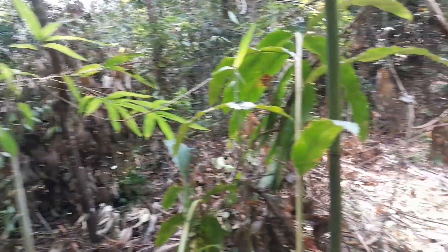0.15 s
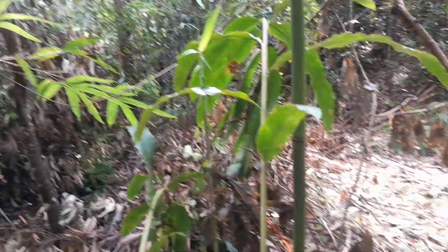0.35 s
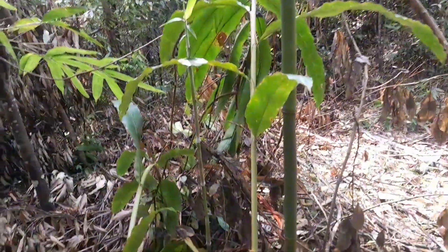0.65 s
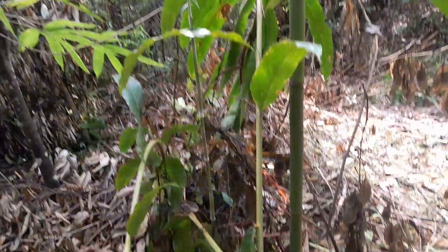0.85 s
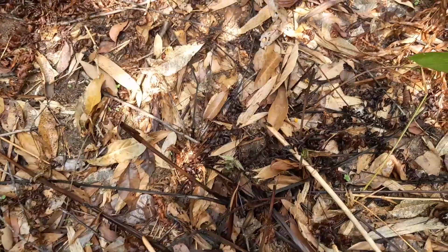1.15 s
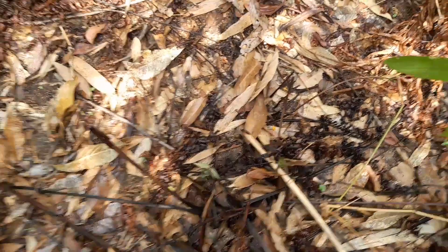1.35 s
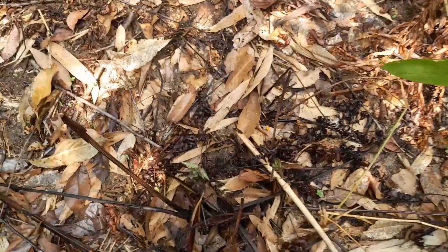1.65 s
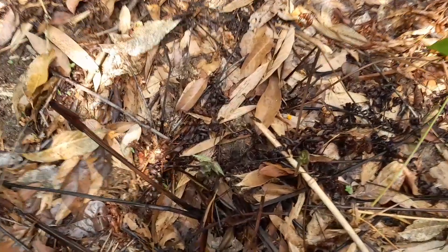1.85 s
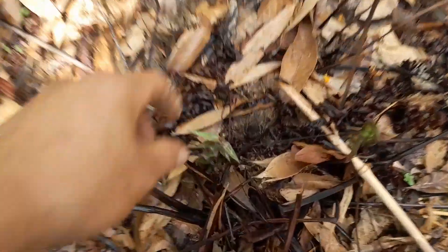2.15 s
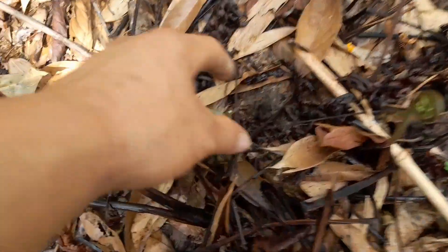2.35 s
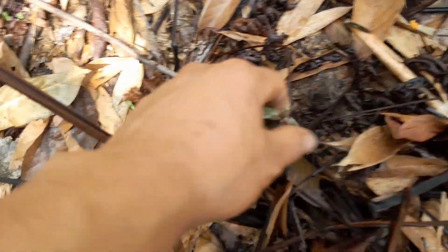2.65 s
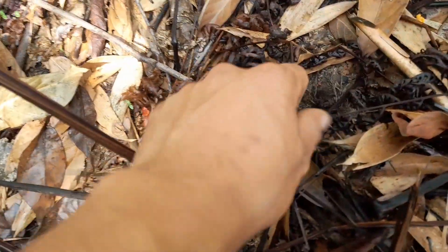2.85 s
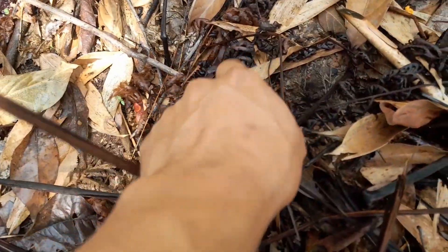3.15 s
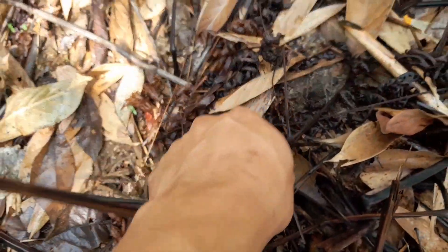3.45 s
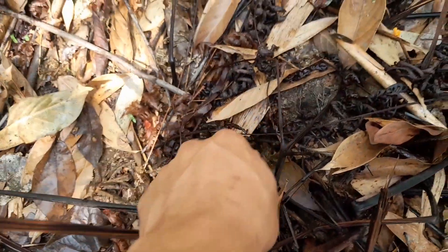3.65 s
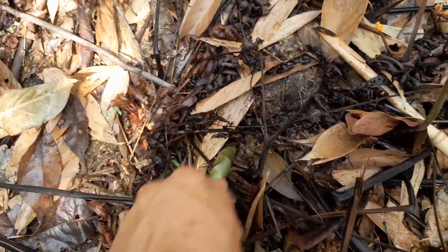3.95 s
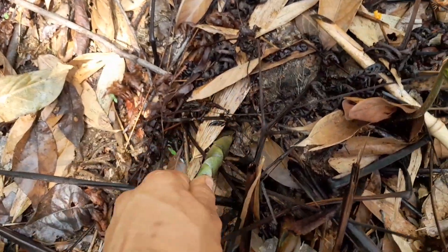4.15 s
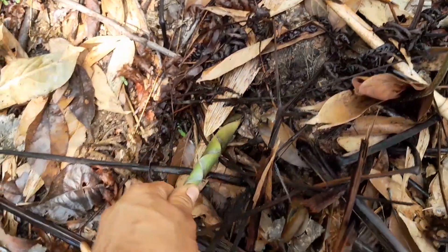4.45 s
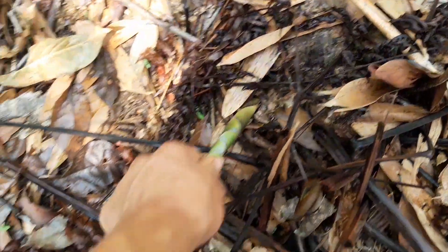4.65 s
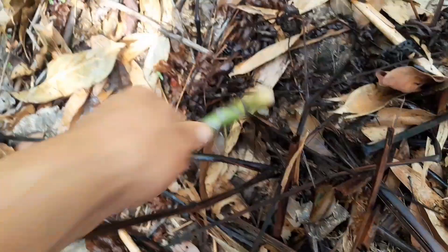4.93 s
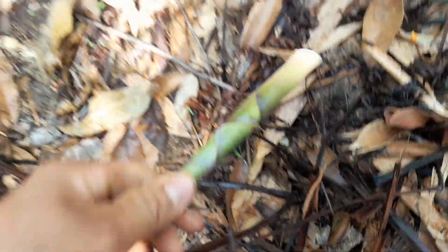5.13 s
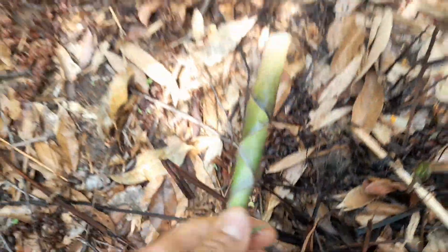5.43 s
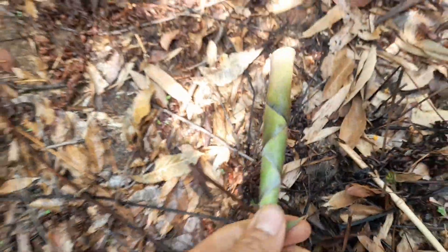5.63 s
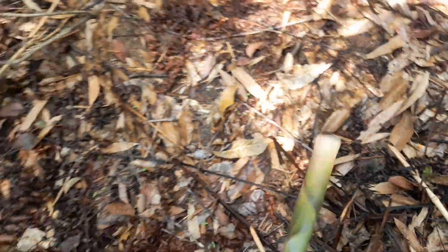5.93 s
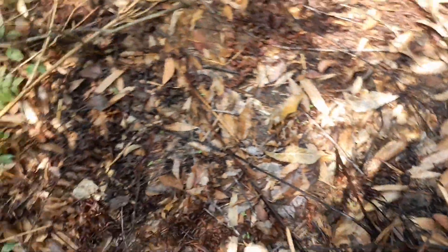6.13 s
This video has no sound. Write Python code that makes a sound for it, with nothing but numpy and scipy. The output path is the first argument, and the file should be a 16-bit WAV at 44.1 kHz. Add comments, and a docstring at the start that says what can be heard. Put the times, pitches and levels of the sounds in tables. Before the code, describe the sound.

A dry leaf crunch, then a green shoot snaps sharply and is pulled free with ticking fibres, under droning cicadas and a whistling bird.

```python
"""In a bamboo thicket with dry leaf litter, a step crunches, then a hand reaches down and snaps off a young shoot.
It draws the shoot out with a run of fibre ticks, and the walk goes on; the hand-held camera is rubbed and bumped.
Cicadas drone throughout; one bird whistles a phrase twice and others chirp further off.
Snaps are short rings with a burst of noise, leaves and rubbing are grainy noise, bumps are fading low tones.
Cicadas are narrow bands of noise, birds are gliding pure tones, and the forest is soft shaped noise."""
import sys
import numpy as np
from scipy import signal
from scipy.fft import rfft, irfft, next_fast_len
from scipy.io import wavfile
from scipy.ndimage import uniform_filter1d, map_coordinates

SR = 44100
rng = np.random.default_rng(int(sys.argv[2]) if len(sys.argv) > 2 else 0)


def store_pcm(level_fs):
    """Save levels as 16-bit WAV."""
    pcm = np.round(np.clip(level_fs, -1, 1) * 32767).astype(np.int16)
    wavfile.write(sys.argv[1], SR, np.atleast_2d(pcm).T)


N = 277389
CUT_S = 0.96  # here the scene jumps from the walk to the crouch
TOP_HZ = 16200  # the camera's upper limit


# Small tools that the sounds below share

def amp(db):
    """Turn decibels into gain."""
    return 10 ** (np.asarray(db) / 20)


def unit(x):
    """Bring x to rms 1."""
    return x / np.sqrt(np.mean(x ** 2) + 1e-20)


def level(rows, column=1):
    """Gain per sample from a dB column; silent outside the rows."""
    rows = np.asarray(rows)
    return amp(np.interp(np.arange(N) / SR, rows[:, 0], rows[:, column], left=-120, right=-120))


def strokes(rows):
    """Gain per sample of movements that swell to a peak and die away; none carries across the jump."""
    drop_db, curve = 9.5, 1.56  # drop after one rise or fall time; roundness of the peak
    t = np.arange(N) / SR
    power = np.zeros(N)
    for s, rise, fall, db in rows:
        away = np.abs((t - s) / np.where(t < s, rise, fall))
        same_side = (t < CUT_S) == (s < CUT_S)
        power += (amp(db - drop_db * away ** curve) * same_side) ** 2
    return np.sqrt(power)


def panned(left_db):
    """Gains of the two channels, the left one louder by left_db."""
    return unit(amp([[left_db / 2], [-left_db / 2]]))


def left_late(x, delay):
    """Let the left port answer a moment (s) after the right."""
    t = np.arange(N) / SR
    return np.array([np.interp(t - delay, t, x[0]), x[1]])


def coloured(x, points):
    """Shape x with a spectrum of (f/Hz, level/dB) points, joined on a log frequency axis."""
    size = x.shape[-1]
    padded = next_fast_len(size + 2048)
    hz, db = np.transpose(points)
    gain = amp(np.interp(np.log(np.fft.rfftfreq(padded, 1 / SR) + 1), np.log(hz), db))
    return irfft(rfft(x, padded) * gain, padded)[..., :size]


def wobble(rate, size=N):
    """A smooth random curve through rate random points a second."""
    knots = rng.standard_normal(int(size * rate / SR) + 4)
    return map_coordinates(knots, [np.arange(size) * rate / SR])


def pair(alike, size=N):
    """White stereo noise; alike is the share of power common to both channels."""
    share = np.clip(alike, 0, 1)
    common = np.sqrt(share) * rng.standard_normal(size)
    return common + np.sqrt(1 - share) * rng.standard_normal((2, size))


def grains(rate, spread_db, life, smooth, alike):
    """Stereo crackle: rate tiny breaks a second, each fading over life (s), on a smooth sliding hiss."""
    count = int(rate * N / SR)
    sizes = amp(spread_db * np.minimum(rng.exponential(size=count), 4))  # very unequal breaks
    power = np.bincount(rng.integers(0, N, count), sizes ** 2, N)
    power = signal.lfilter([1], [1, -np.exp(-2 / (life * SR))], power)
    return unit(np.sqrt(power / power.mean() + abs(smooth)) * pair(alike))


def echoes(x, t60, delay):
    """Scatter from stems and ground, different at each ear; t60 and build-up delay in s."""
    t = np.arange(int(t60 * SR)) / SR
    tail = rng.standard_normal((2, len(t))) * amp(-60 * t / t60) * (1 - np.exp(-t / delay))
    return signal.fftconvolve(np.atleast_2d(x), tail / np.linalg.norm(tail[0]), axes=1)[:, :N]


def add(track, s, sound):
    """Mix a sound into a track from time s."""
    part = track[..., round(s * SR):][..., :sound.shape[-1]]
    part += sound[..., :part.shape[-1]]


# snapping fibres, twigs underfoot and clicks on the camera case:
# [t/s, relative level/dB, thickness/dB (more body, less treble), left-right/dB]
SNAPS_AND_CLICKS = [(2.7358, -35.5, 2.5, 8), (3.8495, -6.5, -3.5, 4.5), (3.9413, -6.5, 11, 1.5),
                    (3.9564, -13.5, -1, 1), (3.9706, -10.5, 2, -1), (4.003, -28, -8, 2),
                    (4.0502, -38.5, -2.5, 2), (4.236, -32.5, -7.5, 2.5), (4.2866, -26.5, -5, 2),
                    (4.313, -32.5, 0, 1), (4.3219, -36, -6, 1), (4.3603, -35.5, -7, 2),
                    (4.3893, -31.5, -4, 4), (4.43, -37, -11, 5), (4.452, -32, 3.5, -2),
                    (4.4999, -30, -4.5, -1), (4.5582, -30, -5.5, -1.5), (4.609, -26.5, -6, 3),
                    (4.6997, -31.5, -6, 4), (4.7142, -31.5, -1, 4), (4.734, -35.5, 2, 1),
                    (4.7391, -28.5, -3, 2), (4.7689, -24, 3, 1), (4.791, -15, 4.5, 4),
                    (4.8067, -23.5, 10, 11), (4.8147, -20.5, -2.5, -4), (4.822, -12.5, 7.5, 5.5),
                    (4.8564, -32.5, -2, -1), (4.9577, -36, -1, 3), (5.9248, -24, 10.5, 6),
                    (6.0845, -25.5, -1, 3), (6.108, -28, 13, 5), (6.1372, -33, 11, -2),
                    (6.1629, -23.5, 14.5, 7)]
# tones that every snap or click rings with, those of a snapping stalk:
# [f/Hz, relative level/dB, time to fade by 60 dB: t/s, left-right/dB]
STALK_TONES = [(597, -17.5, 0.0097, -0.5), (1380, 1, 0.0042, -6), (2464, -17, 0.009, 7.5),
               (3810, -27.5, 0.0083, 8), (4960, -0.5, 0.0042, -4.5), (5860, -2.5, 0.0058, -13),
               (7360, -2.5, 0.0064, -1), (10520, 4, 0.0044, 0), (13120, 8.5, 0.0031, -13)]


def snaps(crack_db=0, crack_t60=0.007, attack=0.00071, onset=0.00078, port_delay=.000058):
    """Each snap or click is a crack of noise with a ring of a few cycles; the litter scatters it."""
    lead_s = .004  # silence ahead of each click, room for the spectrum shaping
    out = np.zeros((2, N))
    t = np.arange(SR // 30) / SR
    hz, db, t60, side_db = np.transpose(STALK_TONES)[:, :, None]
    ear = np.array([1, -1])[:, None, None] / 2
    for s, snap_db, thickness, left in SNAPS_AND_CLICKS:
        pitch = hz * np.exp(0.05 * rng.standard_normal(hz.shape))  # no two ring quite alike
        phase = rng.uniform(0, 2 * np.pi, hz.shape) + rng.standard_normal((2, len(hz), 1)) * hz / 9000
        fade = amp(db + ear * side_db - 60 * t / t60)
        ring = (fade * np.sin(2 * np.pi * pitch * (t + ear * port_delay) + phase)).sum(1)
        crack = amp(crack_db - 60 * t / crack_t60) * pair(0.3, len(t))
        click = (ring + crack) * (1 - np.exp(-t / attack))
        click = np.pad(click, ((0, 0), (round(lead_s * SR), 0)))
        body = -17.5 + thickness
        edge = -14 - 0.93 * thickness  # more thickness, less treble
        click = coloured(click, [(40, -33), (200, body - 1), (420, body + 6), (780, body + 5.7), (1200, body - 6),
                                 (2200, body + 7), (3500, 0.5), (8000, -1.0), (11000, edge)])
        add(out, s + onset - lead_s, amp(snap_db + 14.0) * panned(left) * click / np.linalg.norm(click))
    near = amp(-18.5) * echoes(out, t60=0.071, delay=0.0011)
    wide = amp(-23.5) * echoes(out, t60=0.22, delay=0.0067)
    return out + coloured(near + wide, [(300, 10.0), (2000, 2), (7500, -1), (11000, -1)])


# the shoot tearing out of its sheath: [t/s, level/dB]
TEAR_LEVEL = [(4.66, -66), (4.71, -65), (4.76, -65), (4.80, -58), (4.823, -31), (4.835, -51), (4.89, -56.5),
              (4.95, -74)]
# tone colour of the tearing sheath: [f/Hz, relative level/dB]
SHEATH_COLOUR = [(35, -30), (60, -2), (130, 1.5), (260, -4.5), (593, -7.5), (700, -10), (1040, -1),
                 (1250, -6), (2000, -0.5), (3120, -8.5), (3760, 4), (7940, -8.5), (16000, -25)]


def tear():
    """The shoot tears from its sheath in many tiny breaks."""
    breaks = grains(rate=550, spread_db=4.5, life=0.0012, smooth=0.15, alike=0.67)
    return level(TEAR_LEVEL) * unit(coloured(breaks, SHEATH_COLOUR)) * panned(-0.66)


# feet coming down in the litter: [peak t/s, rise t/s, fall t/s, peak level/dB]
FOOTSTEPS = [(.9, 0.041, 0.052, -39), (6.11, 0.13, 0.12, -45.5)]
# tone colour of crushed litter: [f/Hz, relative level/dB]
CRUNCH_COLOUR = [(35, -43), (60, -7), (503, 0.5), (1380, -6), (1800, -1.5), (2650, 0), (3000, 1.5),
                 (7750, 0.5), (9130, -11), (13000, -4), (16000, -22)]


def steps():
    """Dry leaves crush underfoot in a dense crackle."""
    crush = grains(rate=890, spread_db=2.5, life=0.0022, smooth=0.16, alike=0.12)
    return strokes(FOOTSTEPS) * unit(coloured(crush, CRUNCH_COLOUR))


# litter under a shifting foot or working fingers: [peak t/s, rise t/s, fall t/s, peak level/dB]
DIG_STROKES = [(.02, .1, 0.075, -65.5), (.5, 0.18, .17, -63), (2.47, 0.56, 0.24, -61),
               (2.9, .15, 0.25, -77), (3.56, 0.55, 0.24, -65.5), (4.03, 0.047, 0.048, -62),
               (4.3, 0.11, .12, -63.5), (4.47, .08, 0.11, -64.5), (5.04, 0.48, 0.16, -62.5),
               (5.36, 0.15, 0.24, -65), (5.6, 0.044, 0.049, -60.5)]
# tone colour of crackling litter: [f/Hz, relative level/dB]
CRACKLE_COLOUR = [(300, -11.5), (2000, -6), (6000, 2), (9000, -5.5), (13000, 1.5), (16000, -4.5)]


def digging():
    """Dry litter crackles sparsely under a shifting foot or working fingers."""
    crackle = grains(rate=320, spread_db=5.0, life=0.0023, smooth=0.33, alike=0.046)
    return strokes(DIG_STROKES) * unit(coloured(crackle, CRACKLE_COLOUR)) * panned(-3.5)


# leaves brushed by legs and sleeve: [peak t/s, rise t/s, fall t/s, level before flutter/dB]
BRUSH_STROKES = [(.42, 0.23, .3, -57), (.73, 0.034, 0.049, -58.5), (2.16, .22, 0.27, -54.5),
                 (2.66, 0.062, 0.1, -58.5), (5.97, 0.32, .22, -54.5)]
# tone colour of sliding leaves: [f/Hz, relative level/dB]
RUSTLE_COLOUR = [(100, -24), (400, -10.5), (1000, -2.5), (1800, 0.5), (2600, -0.5), (3500, -1.5),
                 (6000, -0.5), (8000, 0), (9500, -13.5), (11500, -5), (16000, -12)]


def brushing():
    """Dry leaves slide in uneven surges along legs and sleeve."""
    rustle = grains(rate=770, spread_db=3.5, life=0.0018, smooth=0.92, alike=0.025)
    surges = strokes(BRUSH_STROKES) * amp(0.58 * wobble(22))
    # left-right dB: the camera points down after the jump
    facing = np.where(np.arange(N) / SR < CUT_S, 1.2, -4.5)
    return surges * unit(coloured(rustle, RUSTLE_COLOUR)) * amp([facing / 2, -facing / 2])


# the grip rubbing on the camera: [peak t/s, rise t/s, fall t/s, peak level/dB]
GRIP_STROKES = [(.42, 0.2, 0.32, -67.5), (1.83, 0.12, 0.17, -53.5), (1.96, 0.013, 0.048, -59),
                (2.085, 0.051, 0.083, -54.5), (2.28, 0.04, 0.061, -62.5), (2.655, 0.042, 0.048, -44.5),
                (4.24, .04, 0.049, -70.5), (5.23, .04, 0.15, -72.5), (5.78, 0.092, 0.23, -61),
                (5.99, 0.069, 0.15, -52)]
# tone colour of the rubbed case: [f/Hz, relative level/dB]
CASE_COLOUR = [(25, -32), (45, -15), (70, 6), (120, 1.5), (200, -1), (300, 0), (480, 1), (660, -4),
               (850, -15), (1300, -29.5), (1700, -32), (3000, -37), (6000, -79)]


def grip_rub():
    """Skin slips on the camera's case in small jerks."""
    jerks = grains(rate=670, spread_db=4.0, life=0.0063, smooth=0.17, alike=0.65)
    rub = strokes(GRIP_STROKES) * unit(coloured(jerks, CASE_COLOUR))
    return left_late(rub, delay=0.00021) * panned(2.37)


# fingers bumping the camera: [t/s, level before colouring/dB, f/Hz]
CAMERA_BUMPS = [(1.464, -35, 81), (1.788, -37, 114), (2.069, -41, 313), (2.628, -32.5, 343),
                (2.643, -33, 162), (2.66, -30, 317), (2.680, -30.5, 117), (4.827, -40.5, 83),
                (6.031, -29.5, 370), (6.051, -29, 370.3), (6.089, -26.5, 375), (6.115, -28.5, 377),
                (6.179, -24.5, 378.6), (6.206, -22, 407), (6.233, -23.5, 383), (6.249, -20.5, 380),
                (6.269, -19.5, 398), (6.275, -16.5, 345)]
# tone colour of the thuds: [f/Hz, relative level/dB]
THUD_COLOUR = [(25, -39), (45, -18), (70, -5), (550, -0.5), (800, -6.5), (1500, 27), (3000, -45)]
# tone colour of the clicks: [f/Hz, relative level/dB]
CLICK_COLOUR = [(200, -15), (900, 5), (1500, -9), (2000, -6), (4000, 1.5), (7500, -4), (10000, -14.5),
                (16000, -17)]


def bumps(cycles=4.14):
    """A finger's bump thuds for a few cycles; a harder contact is higher and clicks more."""
    click_db, click_t60, hard_hz = -7.5, 0.015, 399.8  # click against thud; its fade in s; a hard bump's pitch
    thuds, clicks = np.zeros((2, N)), np.zeros((2, N))
    t = np.arange(SR // 8) / SR
    for s, db, hz in CAMERA_BUMPS:
        turns = hz * t
        thud = amp(-60 * turns / cycles) * (1 - np.exp(-turns / 0.29)) * np.sin(2 * np.pi * turns)
        add(thuds, s, -amp(db) * thud / np.abs(thud).max())
        hardness = (hz / hard_hz) ** 3
        add(clicks, s, amp(db + click_db - 60 * t / click_t60) * hardness * pair(.4, len(t)))
    low = left_late(coloured(thuds, THUD_COLOUR), delay=0.00041) * panned(8.8)
    return low + coloured(clicks, CLICK_COLOUR) * panned(3.1)


# rumble of the swaying camera: [t/s, level/dB]
SWAY_LEVEL = [(5.85, -80), (5.96, -43), (6.02, -43), (6.05, -36.5), (6.14, -37.5), (6.2, -37.5),
              (6.29, -31)]
# tone colour of the rumble: [f/Hz, relative level/dB]
RUMBLE_COLOUR = [(25, -40), (50, -21), (68, -1), (115, 3), (180, -6.5), (300, -24), (700, -28.5),
                 (1800, -23), (3500, -72)]


def camera_sway():
    """The swaying camera rumbles: low noise, later and much louder at the left port."""
    sway = level(SWAY_LEVEL) * unit(coloured(pair(0.98), RUMBLE_COLOUR))
    return left_late(sway, delay=0.00183) * panned(8.8)


# cicadas before flutter: [t/s, low singer level/dB, high chorus level/dB]
CICADA_LEVELS = [(0.0, -58.5, -57.5), (.6, -57.5, -54.5), (.96, -64, -62), (1.25, -65.5, -66.5),
                 (2.26, -55.5, -61.5), (2.8, -60.5, -67.5), (4.8, -60, -65), (5.7, -63, -69),
                 (6.29, -57, -59.5)]
# tone colour of the low singer: [f/Hz, relative level/dB]
LOW_SINGER_COLOUR = [(3700, -47), (4080, -29.5), (4200, -7.5), (4245, -3), (4275, 4), (4320, -10),
                     (4370, -14.5), (4700, -23.5), (5200, -54)]
# tone colour of the high chorus: [f/Hz, relative level/dB]
HIGH_CHORUS_COLOUR = [(6000, -49), (6900, -11), (7300, -7.5), (7680, 4.5), (7930, -20.5), (8100, -1),
                      (8250, -10.5), (9000, -37), (9800, -64)]


def cicadas():
    """Many tymbals (the insects' drum skins) blur into a narrow fluttering tone and a wider band above."""
    low = level(CICADA_LEVELS, 1) * amp(1.6 * wobble(9.4)) * unit(coloured(pair(0.24), LOW_SINGER_COLOUR))
    high = level(CICADA_LEVELS, 2) * amp(1.2 * wobble(25)) * unit(coloured(pair(0.067), HIGH_CHORUS_COLOUR))
    return low + high


def song(notes, waver, waver_rate, swell):
    """Pure tones that glide through three pitches, swelling and fading."""
    out = np.zeros(N)
    for s, length, first, middle, last, db in notes:
        u = np.linspace(0, 1, int(length * SR))  # progress through the note
        glide = np.polyval(np.polyfit([0, .5, 1], [first, middle, last], 2), u)
        hz = glide * (1 + waver * wobble(waver_rate, len(u)))
        shape = np.abs(np.sin(np.pi * u ** swell)) ** 0.34
        add(out, s, amp(db) * unit(shape * np.sin(2 * np.pi * np.cumsum(hz) / SR)))
    return out


# notes of the phrase before its pitch ratio:
# [t into phrase/s, length t/s, start f/Hz, middle f/Hz, end f/Hz, relative level/dB]
WHISTLED_NOTES = [(0, 0.078, 2820, 3020, 3060, -13), (0.178, .06, 3290, 3260, 3240, -11.5),
                  (0.238, 0.1, 3260, 3120, 2920, -1), (0.475, 0.19, 2870, 2805, 2845, -0.5),
                  (0.657, .075, 2800, 2620, 2400, -4.5)]
# its two deliveries, the first screened by the thicket:
# [t/s, pitch ratio, relative level/dB, direct level/dB, echo level/dB]
DELIVERIES = [(.196, .988, -48, -7.5, 0), (5.7, 1.001, -41, -2.5, -4)]


def whistler(stems_db=-4):
    """One phrase, twice: direct, off nearby stems and as a long forest echo; the jump cuts the first short."""
    out = np.zeros((2, N))
    walking = np.arange(N) / SR < CUT_S
    for s, ratio, db, direct_db, echo_db in DELIVERIES:
        notes = [(s + at, length, ratio * first, ratio * middle, ratio * last, db + note_db)
                 for at, length, first, middle, last, note_db in WHISTLED_NOTES]
        voice = song(notes, waver=0.0029, waver_rate=74.8, swell=1.3)
        stems = amp(stems_db) * echoes(voice, t60=.07, delay=0.002)
        scatter = stems + echoes(voice, t60=0.58, delay=0.024)
        heard = walking == (s < CUT_S)
        out += heard * (amp(direct_db) * voice + amp(echo_db) * scatter)
    return out


# a far bird's falling slurs: [t/s, start f/Hz, level before echo/dB]
FALLING_SLURS = [(1.15, 2955, -74.5), (1.46, 3470, -77.5), (2.911, 2980, -72.5), (3.135, 2860, -73),
                 (3.395, 2930, -74), (5.18, 3110, -76), (5.417, 2860, -72.5)]


def slurs():
    """A short whistle slides down to little more than half its starting pitch."""
    notes = [(s, .055, hz, .74 * hz, 0.559 * hz, db) for s, hz, db in FALLING_SLURS]
    return song(notes, waver=0.024, waver_rate=300, swell=0.64)


# arched chirps: [t/s, length t/s, middle f/Hz, level before echo/dB]
ARCHED_CHIRPS = [(1.656, 0.081, 7230, -64), (1.662, 0.087, 853, -74.5), (3.061, 0.051, 7750, -52.5),
                 (3.43, .055, 7220, -63), (3.535, .07, 6980, -60), (4.171, 0.0478, 7510, -54),
                 (5.2, 0.045, 7540, -55.5)]


def arches():
    """A chirp's pitch rises and falls again."""
    notes = [(s, length, .87 * hz, hz, .9 * hz, db) for s, length, hz, db in ARCHED_CHIRPS]
    return song(notes, waver=0.024, waver_rate=300, swell=0.64)


# faint gliding whistles: [t/s, length t/s, start f/Hz, middle and end f/Hz, level before echo/dB]
GLIDING_WHISTLES = [(1.499, .7, 2466, 2333, -82), (3.078, .4, 2935, 3100, -75.5),
                    (4.954, .03, 3710, 3100, -68)]


def drawls():
    """A faint whistle glides towards a second pitch and wavers about it."""
    notes = [(s, length, first, last, last, db) for s, length, first, last, db in GLIDING_WHISTLES]
    return song(notes, waver=0.0188, waver_rate=360, swell=1.1)


def birds():
    """Far birds slur, chirp and whistle, blurred by the forest into echoes alone."""
    far = slurs() + arches() + drawls()
    return amp(1.5) * echoes(far, t60=0.067, delay=0.0016) + amp(1.0) * echoes(far, t60=.55, delay=0.003)


# tone colour of the distant air: [f/Hz, relative level/dB]
AIR_COLOUR = [(20, -17), (45, -1.5), (80, 4.5), (160, -6), (400, -12.5), (900, -18.5), (1500, -27),
              (4000, -13), (7000, -16), (9200, -23.5), (16000, -27)]
# tone colour of the far insects and birds: [f/Hz, relative level/dB]
HAZE_COLOUR = [(1400, -18), (1850, -3), (2150, -4.5), (2850, 4.5), (3300, -3.5), (4800, -1.5),
               (6500, -12.5), (9000, -35)]


def forest(patchy_db=2):
    """Distant air is steady soft noise; far insects and birds are a haze in patches of time and pitch."""
    air = amp(-70.0) * unit(coloured(pair(0.11), AIR_COLOUR))
    spectrum = signal.stft(pair(0.064), nperseg=512)[2]
    patches = rng.standard_normal(spectrum.shape[1:])
    patches = uniform_filter1d(patches, size=5, axis=0)  # smooth over pitch
    patches = unit(uniform_filter1d(patches, size=20, axis=1))  # smooth over time
    haze = signal.istft(spectrum * amp(patchy_db * patches), nperseg=512)[1][:, :N]
    return air + amp(-73.5 + 3.5 * wobble(4.8)) * unit(coloured(haze, HAZE_COLOUR))


def scene():
    """Everything at the two microphone ports."""
    ground_and_shoot = snaps() + tear() + steps() + digging() + brushing()
    camera = grip_rub() + bumps() + camera_sway()
    return ground_and_shoot + camera + cicadas() + whistler() + birds() + forest()


def record(dry):
    """The camera keeps nothing above its band limit."""
    padded = next_fast_len(N + SR // 2)
    kept = np.fft.rfftfreq(padded, 1 / SR) < TOP_HZ
    return irfft(rfft(dry, padded) * kept, padded)[:, :N]


dry = scene()
out = record(dry)
store_pcm(out)
```